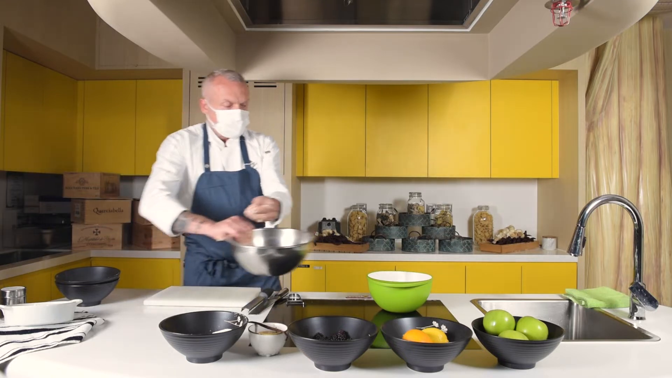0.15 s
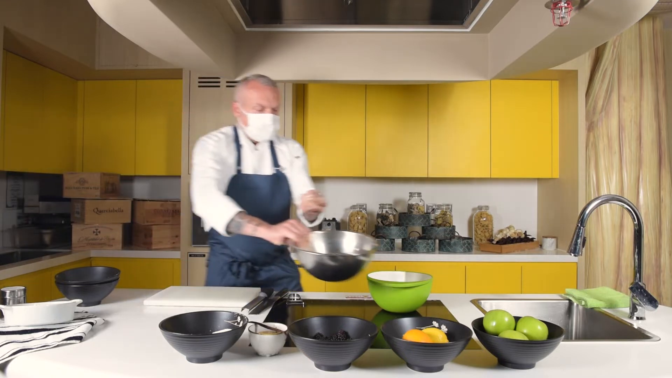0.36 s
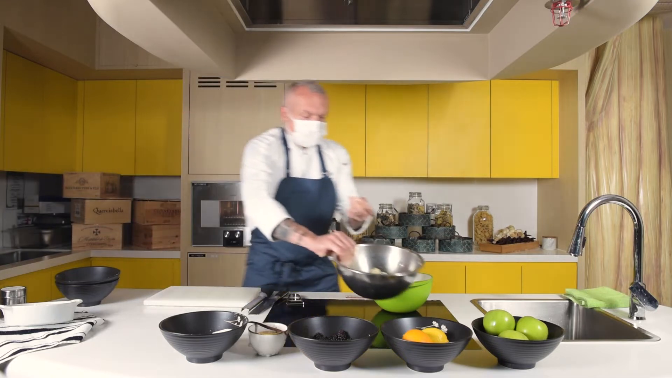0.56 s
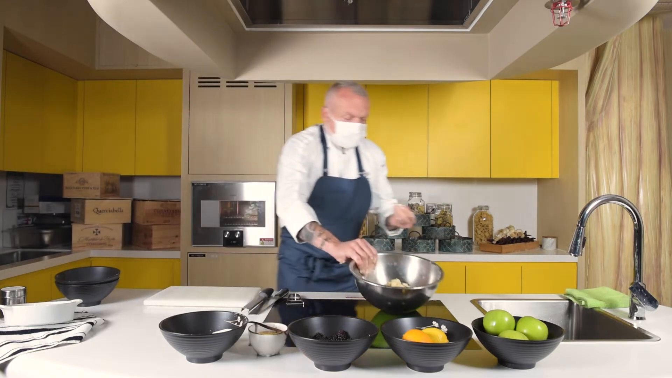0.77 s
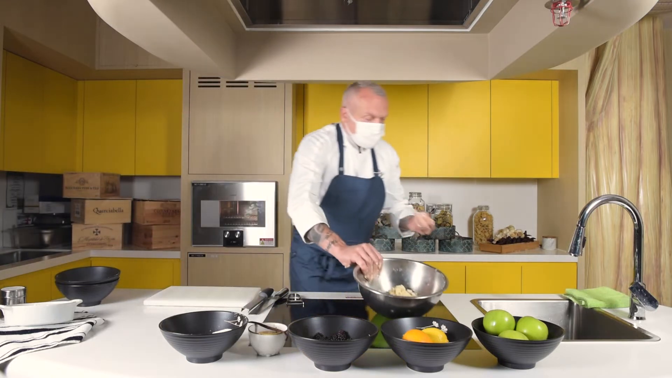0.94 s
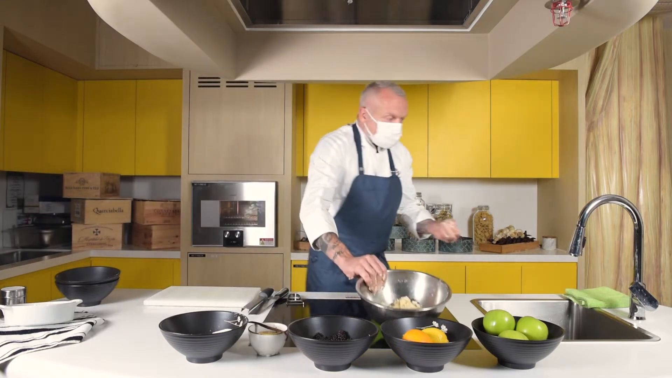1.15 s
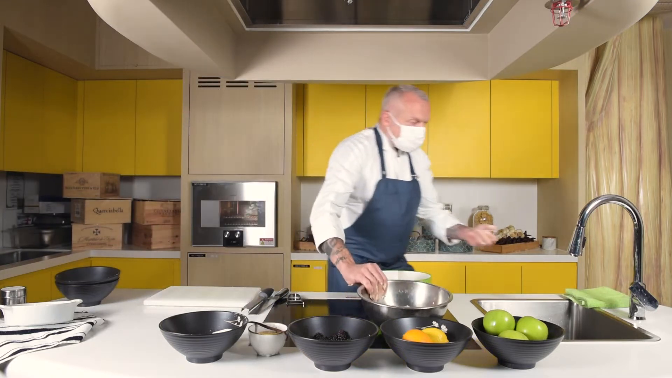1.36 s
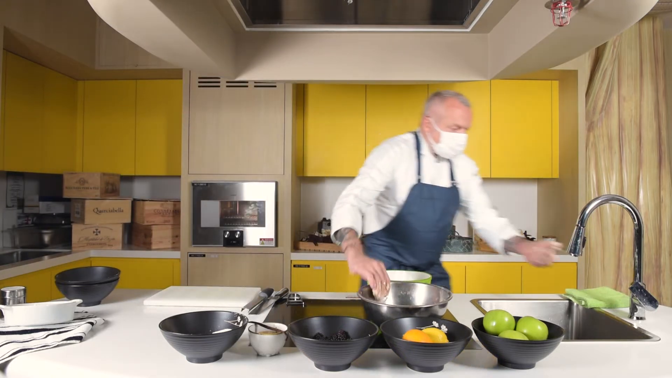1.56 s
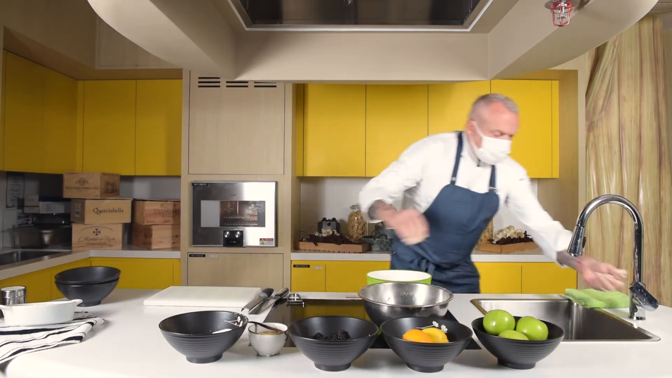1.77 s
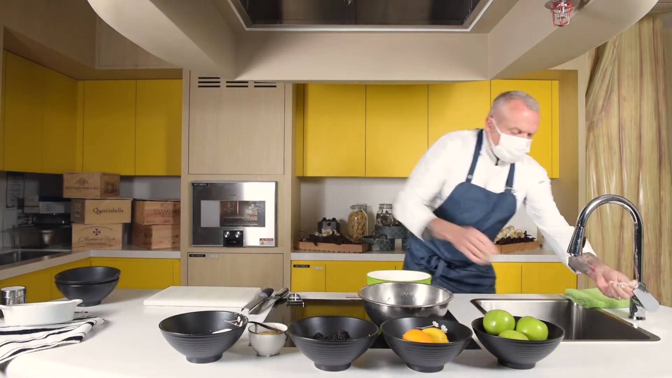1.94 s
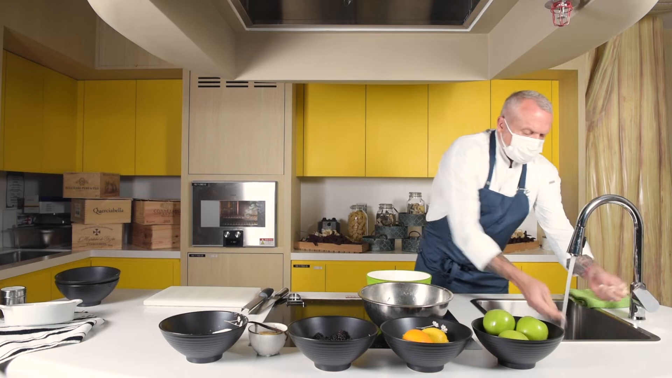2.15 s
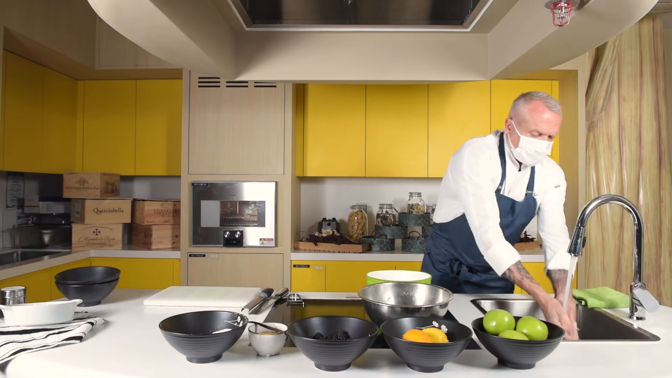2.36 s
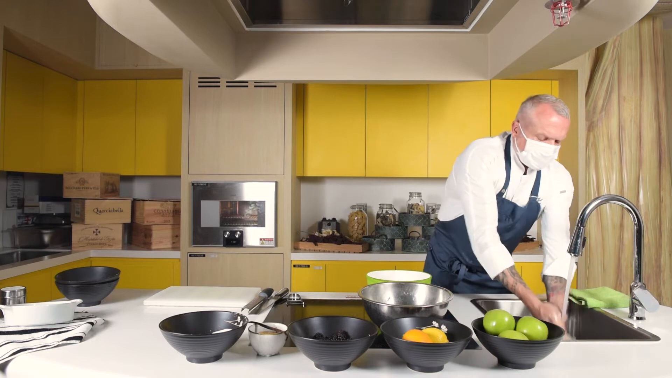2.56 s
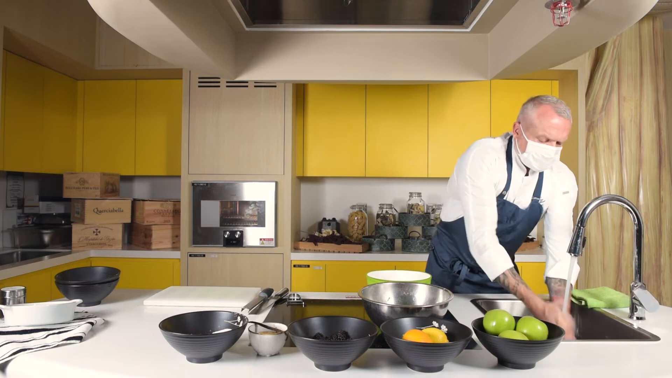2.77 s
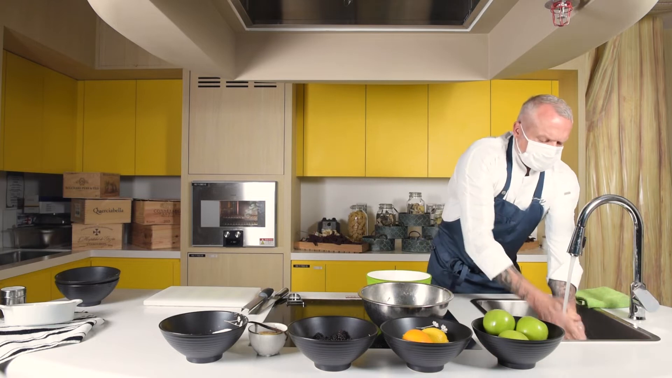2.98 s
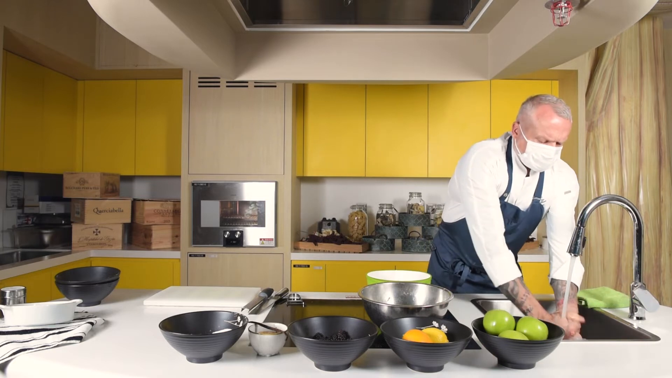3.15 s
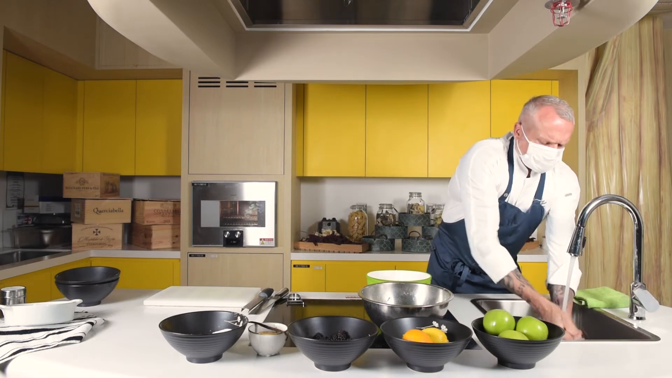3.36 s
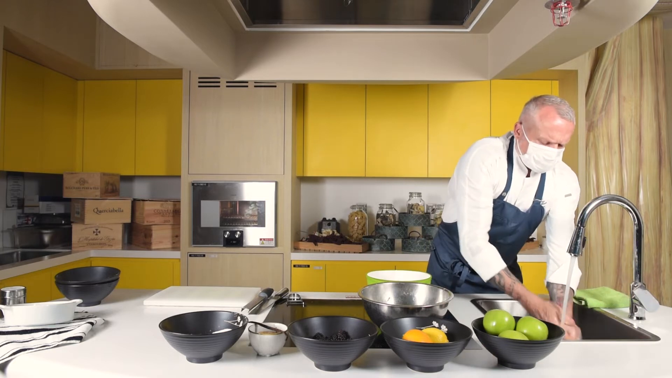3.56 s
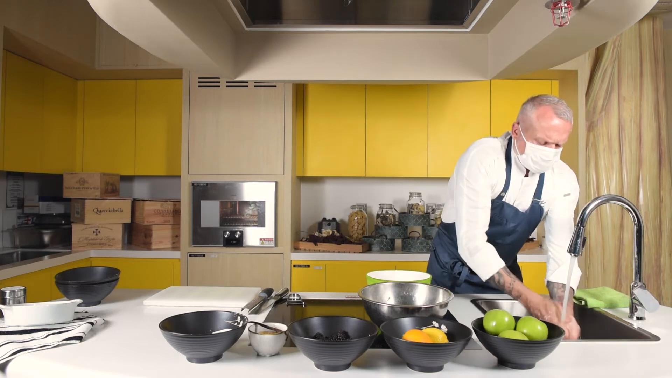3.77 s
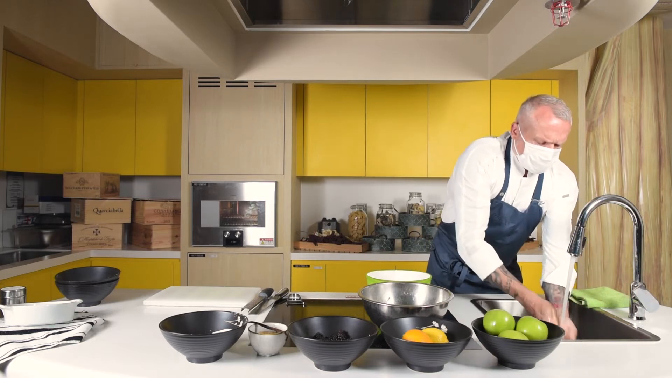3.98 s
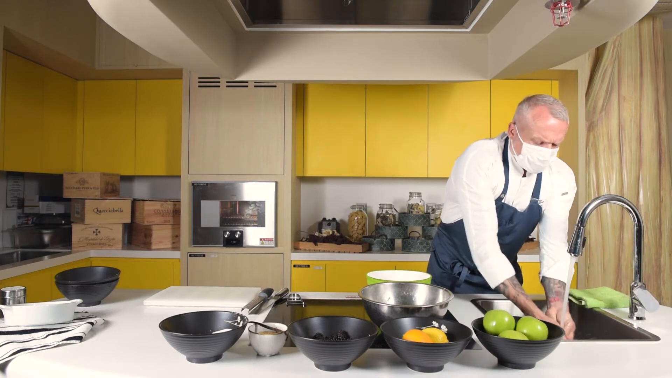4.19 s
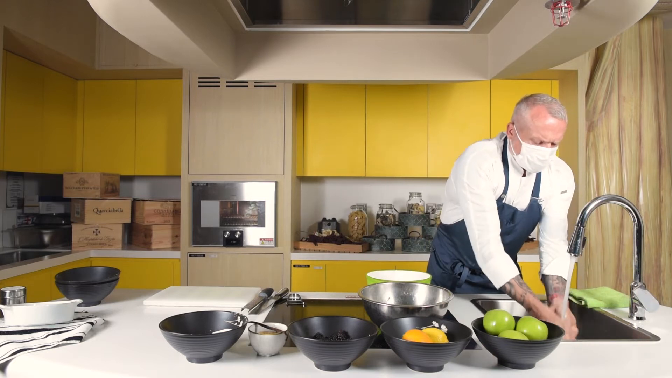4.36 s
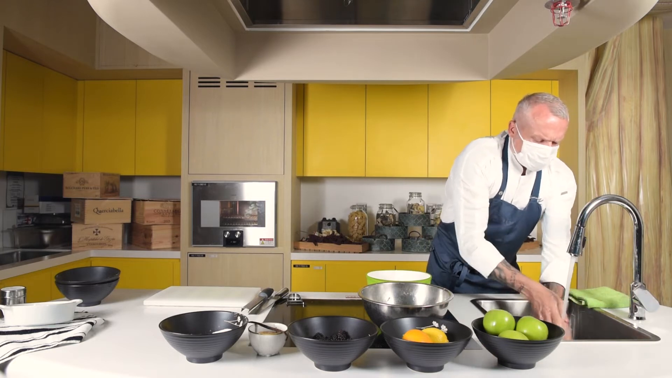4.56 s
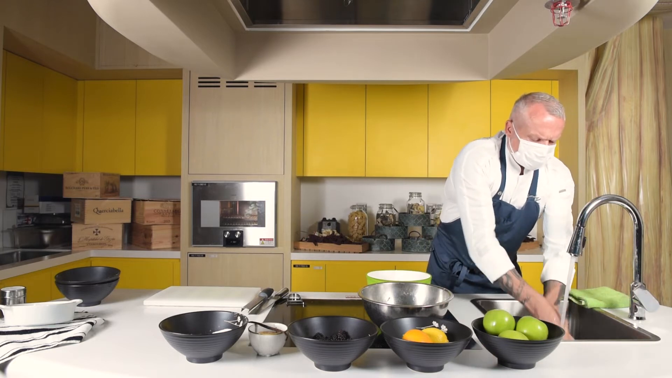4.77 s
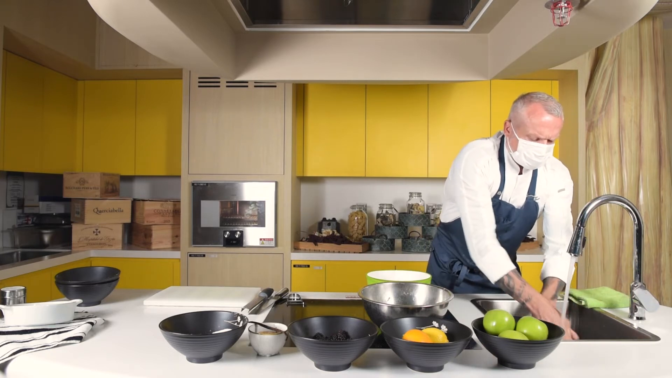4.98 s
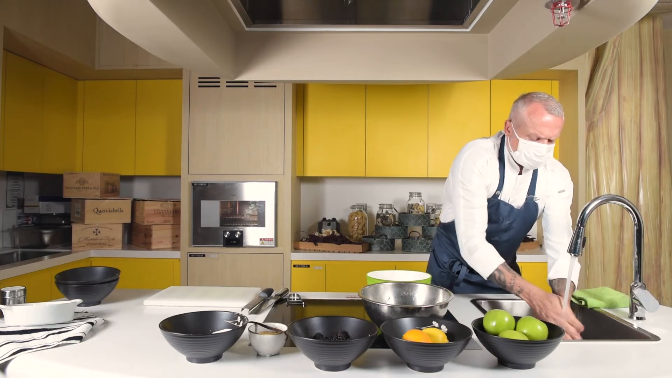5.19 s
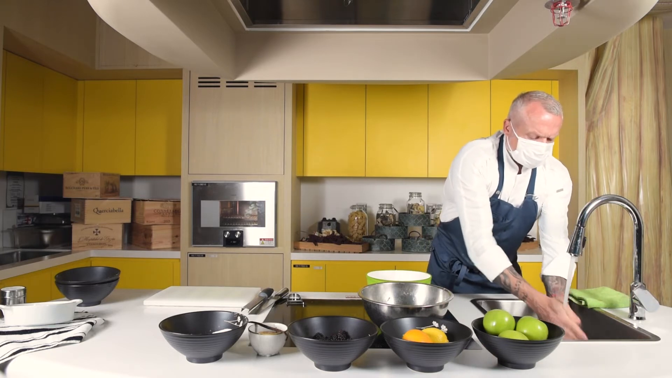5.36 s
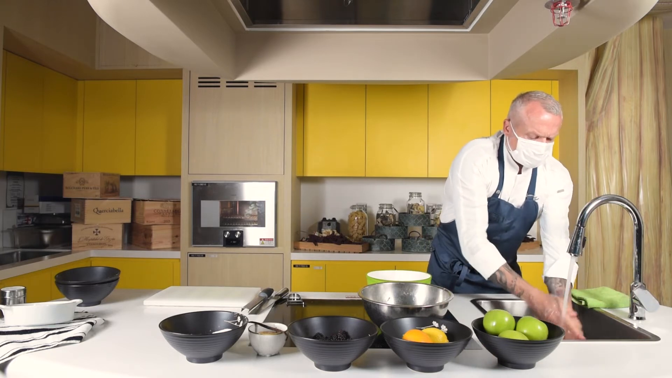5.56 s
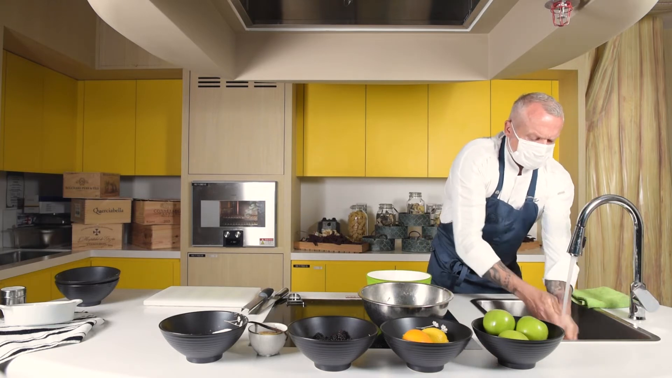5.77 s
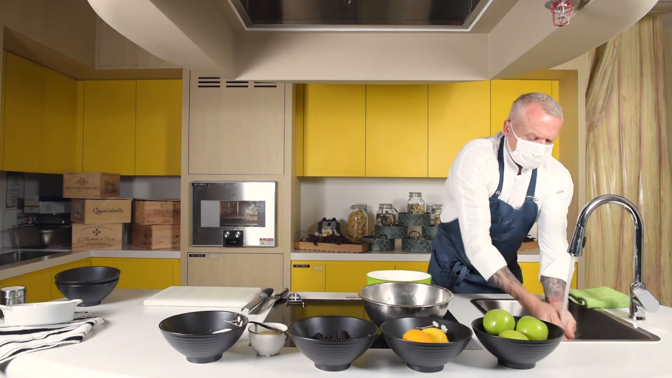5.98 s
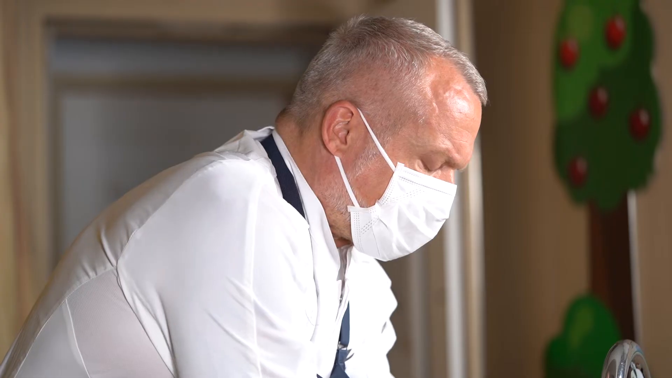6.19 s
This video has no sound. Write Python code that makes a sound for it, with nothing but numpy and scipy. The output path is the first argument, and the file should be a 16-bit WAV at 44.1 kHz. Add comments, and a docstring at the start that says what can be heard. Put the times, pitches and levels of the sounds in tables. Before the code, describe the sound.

A low hum of room air and a faint rustle of clothes open the scene in a small, hard-walled kitchen with a short echo. At about 0.6 seconds a hand-held steel bowl scrapes briefly and knocks hollowly against a plastic bowl, which rocks with dull thuds. A softer, duller bump follows near 1 second. At 1.2 seconds the steel bowl lands hard on the counter, by far the loudest sound, briefly overloading the microphone, then settles with a clatter that rings for under half a second. At 2 seconds a tap opens, with a bright splash on the hands at 2.2. The airy stream fizzes and sprays until the end, just past 6 seconds, much quieter than the landing. Water spills off the hands in irregular splashes, notably around 3.1, 4.2 and 5.6 seconds. Underneath, the sink drums softly, with tiny bubbling plinks and occasional brief low booms.

```python
"""Bowls and a running tap

A steel bowl bumps a plastic one twice on its way across a kitchen counter and is set down hard,
overloading the microphone. Then a tap opens: a bubbly stream fizzes into the sink and over two hands,
which shed splashes, while the basin drums softly. The small, hard-walled kitchen adds a short echo."""
import sys
import numpy as np
from scipy import signal
from scipy.fft import rfft, irfft, next_fast_len
from scipy.io import wavfile

SR = 44100
rng = np.random.default_rng(int(sys.argv[2]) if len(sys.argv) > 2 else 0)


def pcm_store(signal):
    """Save signal as 16-bit PCM."""
    levels = np.round(np.clip(np.atleast_2d(signal), -1, 1) * 32767)
    wavfile.write(sys.argv[1], SR, levels.astype(np.int16).T)


N = 274743
TIME = np.arange(N) / SR
ONE_SECOND = TIME[:SR]


def undb(db):
    """Turn decibels into a gain."""
    return 10 ** (np.asarray(db) / 20)


def unit(x):
    """Scale a signal to an average power of one."""
    return x / np.sqrt(np.mean(x ** 2) + 1e-20)


def over_pitch(table, hz):
    """Read between a table's rows along a scale of octaves."""
    points, values = np.transpose(table)
    return np.interp(np.log(hz + 1e-3), np.log(points), values)


def over_time(table):
    """Join a table's rows into a curve over time."""
    return np.interp(TIME, *np.transpose(table))


def colour(x, spectrum):
    """Shape a signal's tone with rows of Hz and dB, falling away beyond both ends."""
    size = next_fast_len(len(x))
    hz = np.arange(size // 2 + 1) * SR / size
    low_cut = np.minimum(hz / spectrum[0][0], 1) ** 2
    high_cut = np.minimum(spectrum[-1][0] / (hz + 1), 1) ** 2
    return irfft(rfft(x, size) * undb(over_pitch(spectrum, hz)) * low_cut * high_cut, size)[:len(x)]


def noise(spectrum, size=N):
    """Smooth noise with the given tone."""
    return unit(colour(rng.standard_normal(size), spectrum))


def drops(per_s, spread_db, size=N):
    """Random impacts, many small and a few large."""
    chance, weight, sign = rng.random(size), rng.exponential(size=size), rng.choice([-1, 1], size)
    return unit((chance < per_s / SR) * sign * undb(spread_db * np.minimum(weight, 5)))


def patter(spectrum, per_s, spread_db, size=N):
    """Random impacts with the given tone."""
    return unit(colour(drops(per_s, spread_db, size), spectrum))


def drift(per_s):
    """A random wander around zero, about one wide."""
    points = rng.standard_normal(2048)
    return np.interp(TIME * per_s, np.arange(len(points)), points)


def add(track, s, sound):
    """Mix a sound into a track, starting at s seconds."""
    start = max(int(s * SR), 0)
    track[start:start + len(sound)] += sound[:max(len(track) - start, 0)]


def fade(ring_s):
    """A fade that falls 60 dB in the ring time."""
    return np.exp(-np.log(1000) * ONE_SECOND / max(ring_s, 1e-3))


def die_away(x, ring_times):
    """Let each octave of a one-second signal fade at its own speed."""
    octave = np.log2(np.clip(np.arange(SR // 2 + 1), 64, 16384))
    spectrum = rfft(x)
    out = np.zeros(SR)
    for k in range(6, 15):
        band = irfft(spectrum * np.maximum(1 - abs(octave - k), 0), SR)
        out += band * fade(over_pitch(ring_times, 2. ** k))
    return out


def ring(notes):
    """A struck object's fading notes; where it is hit sets the sign and strength of each."""
    strengths = rng.choice([-1, 1], len(notes)) * undb(.8 * rng.standard_normal(len(notes)))
    return sum(strength * undb(db) * np.sin(2 * np.pi * hz * ONE_SECOND) * fade(ring_s)
               for strength, (hz, db, ring_s) in zip(strengths, notes))


def contact(x, bright_hz):
    """A softer, longer contact leaves out the treble."""
    return signal.sosfilt(signal.butter(3, min(bright_hz, SR / 3), fs=SR, output="sos"), x)


# The tones of room air and of cloth. Each row: frequency in Hz, relative level in dB.
AIR_TONE = [(30, -37.5), (60, -20.5), (110, -0.5), (250, 5.5), (450, 0), (700, -3), (1500, -7.5),
            (2300, -17.5), (4200, -19), (5500, -32), (9000, -30.5), (15000, -35.5)]
CLOTH_TONE = [(60, -22), (150, -3.5), (280, 2), (500, -13), (1300, -16), (2500, -26), (5000, -30),
              (9000, -48.5)]
# How loudly the clothes rustle. Each row: time in seconds, level in dB.
RUSTLE_LEVEL = [(0, -50.5), (.12, -66), (.22, -47.5), (.35, -50), (.58, -50), (.9, -54), (1.15, -68),
                (1.3, -67)]

def background():
    """Room air hums steadily; sleeves and apron rustle while the bowl is carried."""
    air = noise(AIR_TONE) * undb(-51.5 + 0.39 * drift(1.6))
    cloth = noise(CLOTH_TONE) * undb(over_time(RUSTLE_LEVEL) + 0.5 * drift(35))
    return air + cloth


def rub(start_s, db, hz, length_s):
    """The steel bowl drags over the plastic rim with a short, low groan."""
    out, t = np.zeros(N), TIME[:int(length_s * SR)]
    pitch = hz * (1 + 0.054 * drift(150)[:len(t)])
    phase = 2 * np.pi * np.cumsum(pitch) / SR
    groan = np.sin(phase) + undb(-10.5) * np.sin(2 * phase)
    add(out, start_s, undb(db) * np.sin(np.pi * t / length_s) ** 2 * groan)
    return out


# Steel sliding on plastic. Each row: frequency in Hz, relative level in dB.
SCRAPE_TONE = [(300, -2), (1500, -9), (3000, -14.5), (5500, -27), (13000, -31)]

def scrape(peak_s, db, spread_s):
    """The two bowls slide past each other with a faint hiss."""
    return noise(SCRAPE_TONE) * undb(db) * np.exp(-abs(TIME - peak_s) / spread_s)


# The notes of the steel bowl, muffled by a hand, and of the plastic bowl.
# Each row: pitch in Hz, relative level in dB, ring time in seconds.
HELD_STEEL_NOTES = [(612, 1, .11), (665, 1, .1), (797, 3, .05), (877, 2, .08), (1260, -15, .14),
                    (1420, -10, .12), (1529, -8, .18), (1642, -13, .18), (2116, -11, .12), (2900, -14, .1)]
PLASTIC_NOTES = [(45, -15, .15), (110, -10, .18), (148, 0, .19), (168, -5, .18), (210, -8, .2),
                 (285, -13, .15), (505, -5, .2), (560, -2, .19), (615, -9, .2)]
# The crack as they meet. Each row: frequency in Hz, relative level in dB.
CRACK_TONE = [(100, -14), (400, -18.5), (750, 5.5), (1050, -5), (1500, 1.5), (2200, -6), (3100, -13),
              (3700, -17), (4500, -39), (8000, -49)]
# The knocks. Each row: start in seconds, knock gain in dB, brightness in Hz, thud gain in dB.
BUMPS = [(0.628, -27.5, 1400, -55), (0.6495, -7.5, 2850, -27.5), (0.668, -19.5, 2970, -38),
         (0.703, -24.5, 2946, -28.5), (0.729, -25, 3000, -19), (0.955, -21, 850, -39)]

def bumps():
    """The held bowl knocks hollowly against the plastic one, which rocks with dull thuds."""
    out = np.zeros(N)
    for s, db, bright_hz, thud_db in BUMPS:
        crack = noise(CRACK_TONE, SR) * fade(ring_s=0.065)
        knock = undb(-8.5) * ring(HELD_STEEL_NOTES) + undb(-4.5) * crack
        add(out, s, undb(db) * contact(knock, bright_hz))
        add(out, s, undb(thud_db) * contact(ring(PLASTIC_NOTES), bright_hz=1087))
    return out


def swell(db, rise_s):
    """A brief, soft rush with the bowl's tone leads into the landing."""
    time_left = LANDING_BLOWS[0][0] - TIME
    hum = signal.fftconvolve(rng.standard_normal(N), ring(HELD_STEEL_NOTES))[:N]
    rush = unit(hum) + undb(6.5) * noise(CLATTER_TONE)
    return rush * undb(db) * np.exp(-abs(time_left) / rise_s) * (time_left > 0)


# The notes of the free steel bowl, and of the counter with its cabinet.
# Each row: pitch in Hz, relative level in dB, ring time in seconds.
STEEL_NOTES = [(511, -5, .4), (587, -4, .44), (608, -8, .5), (647, -3, .5), (684, -9, .38), (728, -6, .36),
               (823, -2, .36), (915, -9, .35), (950, -11, .35), (1031, -8, .35), (1185, -10, .38),
               (1281, -12, .33), (1416, -10, .3), (1497, -9, .4), (1642, -14, .35), (1943, -11, .4),
               (2130, -13, .35), (2315, -15, .33), (2670, -12, .35), (2955, -13, .25), (3284, -17, .27),
               (3741, -20, .3), (4400, -21, .38)]
COUNTER_NOTES = [(45, -21, .2), (85, -17, .22), (129, -10, .27), (171, -2, .33), (212, -7, .3),
                 (255, 1.5, .34), (281, -1, .28), (325, -3, .34), (358, -2, .36), (398, -4, .4),
                 (434, -2, .36), (473, -2, .34)]
# The bowl's many weaker notes blur into a clatter. Each row: frequency in Hz, relative level in dB.
CLATTER_TONE = [(60, -23), (250, -6), (450, 3.5), (700, 3), (1200, -6), (2700, -13), (4400, -15),
                (5200, -20.5), (7500, -23.5), (12000, -26), (16000, -38.5)]
# How long it lasts. Each row: frequency in Hz, ring time in seconds.
CLATTER_RING_TIMES = [(100, 0.47), (700, 0.43), (3000, 0.44), (6000, 0.44), (12000, 0.12)]
# The blows. Each row: start in seconds, gain in dB, brightness in Hz, the counter's own gain in dB.
LANDING_BLOWS = [(1.2257, 9.5, 14100, -9), (1.250, -3, 4370, -11.5), (1.296, -6.5, 4000, -14)]

def landing():
    """The bowl lands on its foot and settles; each blow rings both bowl and counter."""
    out = np.zeros(N)
    for s, db, bright_hz, thud_db in LANDING_BLOWS:
        clatter = die_away(noise(CLATTER_TONE, SR), CLATTER_RING_TIMES)
        blow = undb(-14.5) * ring(STEEL_NOTES) + undb(thud_db) * ring(COUNTER_NOTES) + undb(-5) * clatter
        add(out, s, undb(db) * contact(blow, bright_hz))
    return out


def slam(db, ring_s):
    """The first instant of steel on the hard counter is a short, very loud crack."""
    out = np.zeros(N)
    add(out, LANDING_BLOWS[0][0], undb(db) * noise(CLATTER_TONE, SR) * fade(ring_s))
    return out


# The tones of tiny bursting bubbles, fine spray, water spilling off the hands and lone drops on steel.
# Each row: frequency in Hz, relative level in dB.
FIZZ_TONE = [(1000, -26), (2500, -48), (3550, -38), (3900, 6.5), (4600, 3.5), (5600, 1.5), (7200, -7),
             (8500, -9), (11000, -31.5)]
SPRAY_TONE = [(5500, -4.5), (7500, -3), (9000, 1.5), (10500, 0.5), (12000, -2.5), (12500, -9.5),
              (15800, -14.5)]
SPILL_TONE = [(1500, -57), (2700, -13.5), (3100, 10), (3700, 11.5), (4600, 8), (7000, -16)]
TICK_TONE = [(2500, -54), (4000, -22), (8000, 16), (12000, 18), (16000, 0)]
# The tap opening, then the fizz and spray shifting as the hands turn.
# Each row: time in seconds, relative level in dB.
TAP_FLOW = [(1.92, -68.5), (1.975, -20.5), (2.029, -2.5), (2.19, 3), (2.221, 2.5)]
FIZZ_LEVEL = [(2.4, -38.5), (2.62, -46.5), (2.68, -31.5), (3.08, -40.5), (3.17, -31), (3.22, -36),
              (4.12, -33.5), (4.14, -32), (4.46, -32), (4.53, -39.5), (5.01, -31.5), (5.29, -41),
              (5.56, -33), (5.6, -27.5), (5.67, -35), (5.99, -39.5), (6.02, -32), (6.23, -30.5)]
SPRAY_LEVEL = [(2.4, -38), (2.62, -45.5), (2.69, -35.5), (3.05, -43), (3.41, -33.5), (3.49, -46),
               (3.51, -39.5), (4.18, -41), (4.42, -31.5), (4.55, -46.5), (5.1, -34), (5.17, -44.5),
               (5.34, -34.5), (5.55, -48.5), (5.58, -37.5), (5.9, -33), (5.99, -43), (6.23, -40.5)]

def stream():
    """The airy jet fizzes and sprays, while larger drops spill off the hands or hit the sink alone."""
    fizz_db, spray_db = over_time(FIZZ_LEVEL), over_time(SPRAY_LEVEL)
    flutter = drift(28)  # the jet breaks unevenly on the moving hands
    fizz = patter(FIZZ_TONE, per_s=8300, spread_db=1.5)
    fizz *= undb(fizz_db - 3.5 + 1.1 * flutter + 1.4 * drift(60))
    spray = patter(SPRAY_TONE, per_s=5800, spread_db=2.0)
    spray *= undb(spray_db - 2.72 + flutter + 1.6 * drift(70))
    spill = patter(SPILL_TONE, per_s=1500, spread_db=1.5) * gushes() * undb(1.6 * drift(30))
    ticks = undb(-15.5) * patter(TICK_TONE, per_s=90, spread_db=5.0)
    droplets = undb(-10.5) * spatter(per_s=13, fade_s=0.0057)
    strays = (ticks + droplets) * undb((fizz_db + spray_db) / 2)
    return (fizz + spray + spill + strays) * undb(over_time(TAP_FLOW))


# Flying droplets. Each row: frequency in Hz, relative level in dB.
SPATTER_TONE = [(3000, -27), (4200, 1), (7000, -9), (11500, -8), (16000, -23)]

def spatter(per_s, fade_s):
    """Small bursts of droplets fly off the fingers at random moments."""
    flicks = abs(drops(per_s, spread_db=1.3))
    loudness = signal.lfilter([1], [1, -np.exp(-1 / (fade_s * SR))], flicks)  # each flick fades
    return unit(patter(SPATTER_TONE, per_s=5800, spread_db=2.0) * loudness)


# The drumming sink. Each row: frequency in Hz, relative level in dB.
BASIN_TONE = [(35, -59), (60, -31), (74, -59), (92, -6.5), (194, 4.5), (426, -10), (840, -12.5),
              (1010, -35), (1310, -8), (1420, -11), (2400, -10), (3120, -2), (5280, -120)]

def basin():
    """The sink drums; as water wanders over it, its resonances swell and fade one by one."""
    out = np.zeros(N)
    for hz in np.geomspace(90, 2600, 12):
        band = [(hz / 2, -36), (hz / 1.2, -3), (hz, 0), (hz * 1.2, -3), (hz * 2, -36)]
        width_db = 10 * np.log10(hz)  # higher bands are wider, so they hold more power
        db = over_pitch(BASIN_TONE, hz) + width_db + 1.8 * drift(25)
        out += patter(band, per_s=1500, spread_db=5.0) * undb(db)
    fade_in = np.clip((TIME - 2.02) / 0.16, 0, 1)
    return unit(out) * undb(-52.5 + 1.5 * drift(1.8)) * fade_in


# Heavy falls of water. Each row: start in seconds, level in dB, pitch in Hz, length in seconds.
BOOMS = [(2.035, -37, 520, 0.068), (2.027, -44, 316, 0.05), (2.764, -38.5, 267.7, 0.1),
         (3.32, -39.5, 166.7, 0.14), (3.85, -40, 192, .14), (5.525, -38.5, 227, 0.071),
         (5.645, -42, 200, 0.039), (5.995, -38, 320, 0.11), (6.189, -27, 221, 0.04)]

def booms():
    """A heavier fall of water makes the basin boom briefly at an unsteady pitch."""
    out = np.zeros(N)
    for s, db, hz, length_s in BOOMS:
        t = TIME[:int(length_s * SR)]
        pitch = hz * (1 + 0.14 * drift(156.7)[:len(t)])
        loudness = undb(db + 5.1 * drift(79)[:len(t)]) * np.sin(np.pi * t / length_s) ** 2
        add(out, s, loudness * np.sin(2 * np.pi * np.cumsum(pitch) / SR))
    return out


# Water leaving the hands. Each row: start in seconds, relative level in dB, pouring time in seconds.
GUSHES = [(2.16, -40.5, .03), (2.2, -27, 0.057), (2.44, -45.5, 0.13), (2.65, -39, 0.13), (2.775, -37, 0.11),
          (2.99, -41, 0.16), (3.132, -33.5, 0.05), (3.36, -40.5, 0.03), (3.519, -46, 0.42),
          (3.865, -37.5, .03), (4.125, -40.5, 0.15), (4.82, -39, 0.032), (4.95, -52, .08),
          (5.576, -32.5, .03), (6.005, -46, 0.098)]

def gushes(rise_s=0.022, drain_db_per_s=95):
    """The strength of the spill: gathered water pours off quickly, then dribbles away."""
    power = np.zeros(N)
    for s, db, pour_s in GUSHES:
        age = TIME - s
        drained_db = drain_db_per_s * np.maximum(age - pour_s, 0)
        power += (np.clip(age / rise_s, 0, 1) * undb(db - drained_db)) ** 2
    return np.sqrt(power)


# Splashes off the hands.
# Each row: start in seconds, level in dB, middle pitch in Hz, width in octaves, fade time in seconds.
SPLASHES = [(2.2056, -10.5, 4350, 0.41, .009), (2.206, -20.5, 2670, 0.53, 0.028),
            (2.204, -19, 8500, 0.43, 0.022), (2.248, -18, 6500, 0.79, 0.013),
            (2.252, -45, 2270, 0.27, 0.19), (2.796, -25.5, 9000, .3, 0.0066),
            (3.0125, -25, 7300, 0.28, .007), (3.15, -27, 4430, 0.38, 0.016),
            (3.519, -28.5, 7000, 0.67, 0.027), (3.616, -29, 4100, 0.84, 0.019),
            (3.874, -29.5, 3700, 0.26, 0.014), (4.035, -38.5, 2610, 0.49, 0.19),
            (4.136, -27, 4230, .45, 0.023), (4.201, -28.5, 1970, 0.3, 0.029),
            (4.247, -28.5, 1368, 0.12, 0.01), (4.249, -24, 3860, 0.81, 0.015),
            (4.418, -30, 11200, 0.38, .018), (4.57, -42.5, 2120, 0.2, 0.03),
            (4.679, -28.5, 4150, 0.14, 0.016), (4.764, -44, 12000, .5, 0.007),
            (4.987, -24, 7040, .6, 0.0052), (5.574, -25, 4200, 0.26, 0.02),
            (5.594, -16, 4220, 0.18, 0.0061), (5.6, -43.5, 2140, 1, 0.12),
            (6.008, -29.5, 2620, 0.17, 0.029), (6.009, -41.5, 1740, 0.63, 0.062),
            (6.085, -27, 4250, .13, 0.0082)]

def splashes():
    """A sheet of water breaks into a burst of drops of about one size."""
    out = np.zeros(N)
    for s, db, hz, octaves, fade_s in SPLASHES:
        band = [(hz * 2 ** (k * octaves), -4.3 * k * k) for k in range(-3, 4)]
        burst = patter(band, per_s=5800, spread_db=1.0, size=SR)
        rise_s = 0.3 * fade_s
        rise = np.minimum(ONE_SECOND / rise_s, 1)
        fall = np.exp(-np.maximum(ONE_SECOND - rise_s, 0) / fade_s)
        add(out, s, undb(db) * burst * rise * fall)
    return out


def bubbles(count, low_hz, high_hz, loudest_db, fade_cycles):
    """Air trapped in the puddle rings briefly, rising in pitch as it surfaces."""
    out, t = np.zeros(N), TIME[:SR // 10]
    tap_open_s = TAP_FLOW[-1][0]
    for when, smallness, softness in rng.random((count, 3)):
        start_s = tap_open_s + when * (N / SR - tap_open_s)
        hz = low_hz * (high_hz / low_hz) ** smallness
        age = t * hz / fade_cycles
        plink = np.sin(2 * np.pi * hz * t * (1 + 0.0292 * age)) * np.exp(-age)
        add(out, start_s, undb(loudest_db - 13 * softness) * plink)
    return out


# How long the kitchen echoes. Each row: frequency in Hz, ring time in seconds.
ROOM_RING_TIMES = [(100, 0.21), (600, 0.23), (3000, 0.34), (7000, 0.38), (14000, 0.091)]

def kitchen(x, echo_db):
    """The direct sound is followed by dense echoes from cupboards and walls."""
    build_up = np.clip((ONE_SECOND - .004) / 0.017, 0, 1)
    tail = die_away(rng.standard_normal(SR), ROOM_RING_TIMES) * build_up
    return x + undb(echo_db) * signal.fftconvolve(x, unit(tail) / np.sqrt(SR))[:N]


def scene():
    """Mix the water and the bowls in the same small room, on one channel."""
    sink = basin() + booms()
    sink += bubbles(count=190, low_hz=604.3, high_hz=2474, loudest_db=-46.5, fade_cycles=11.8)
    water = kitchen(stream(), echo_db=-17) + kitchen(splashes(), echo_db=-6) + kitchen(sink, echo_db=-7)
    touches = bumps() + rub(start_s=.592, db=-28.5, hz=245, length_s=0.035)
    touches += scrape(peak_s=.625, db=-44.5, spread_s=0.035)
    bowls = kitchen(touches, echo_db=-7) + kitchen(landing(), echo_db=-13)
    bowls += slam(db=15.5, ring_s=0.052) + swell(db=-26.5, rise_s=0.017)
    return (bowls + water + background())[None]


def record(dry):
    """The overloaded microphone flattens the loudest peaks, and the highest treble is cut."""
    clipped = np.clip(dry, -1, 1)
    treble_cut = signal.ellip(8, .1, 60, 15900, fs=SR, output="sos")
    return signal.sosfilt(treble_cut, clipped)


dry = scene()
out = record(dry)
pcm_store(out)
```